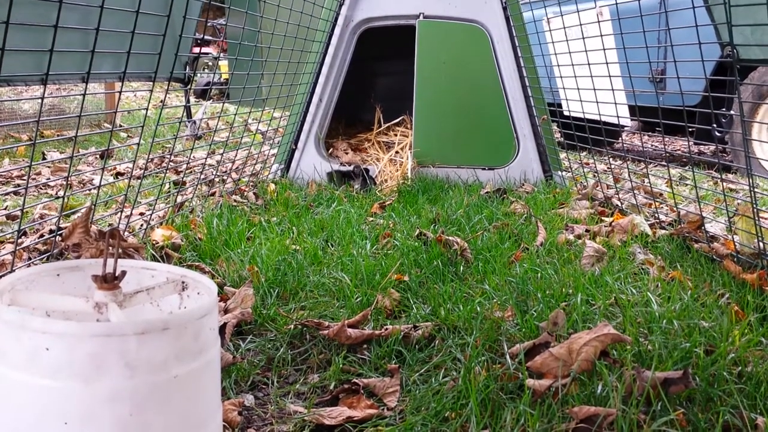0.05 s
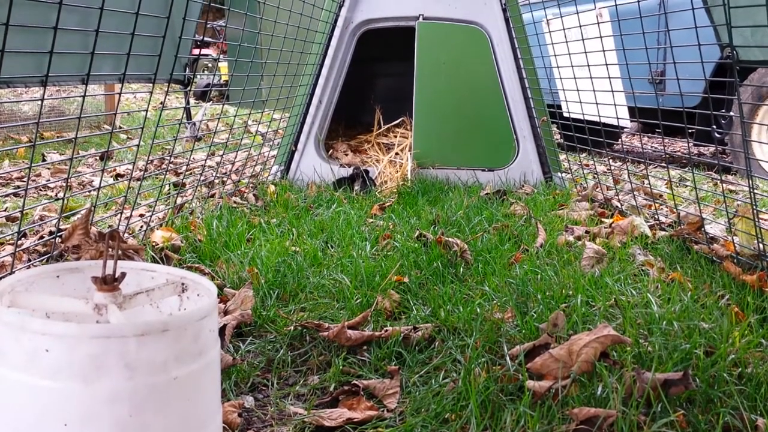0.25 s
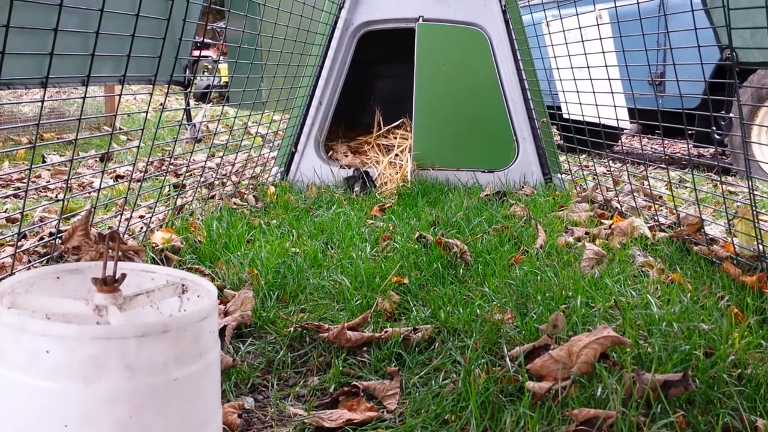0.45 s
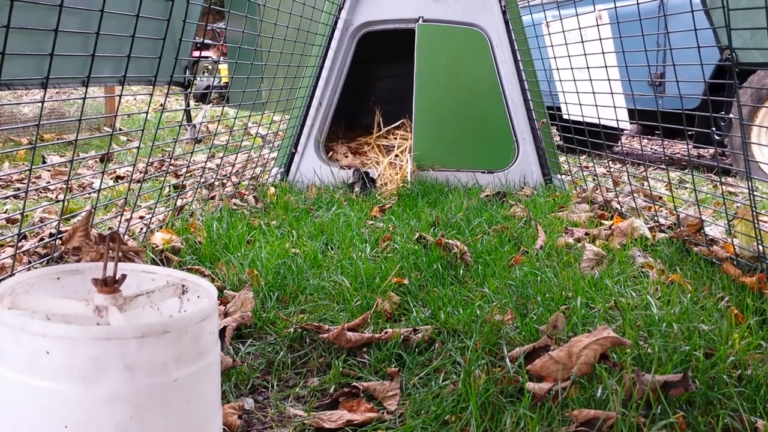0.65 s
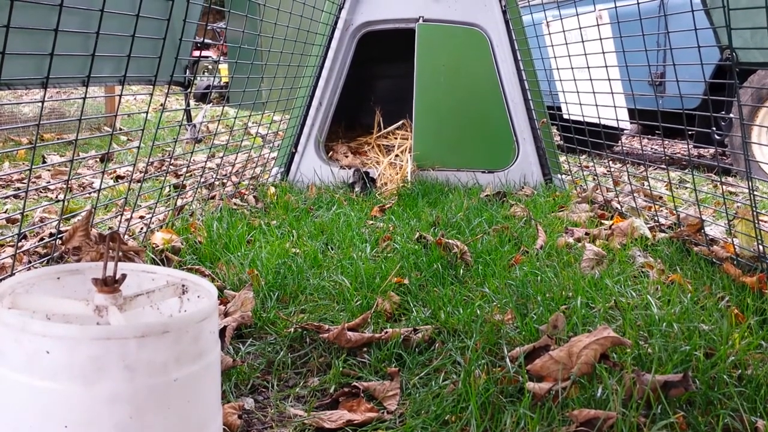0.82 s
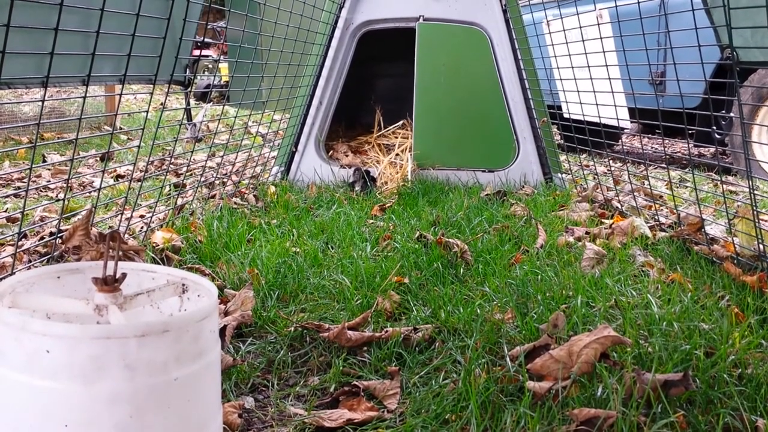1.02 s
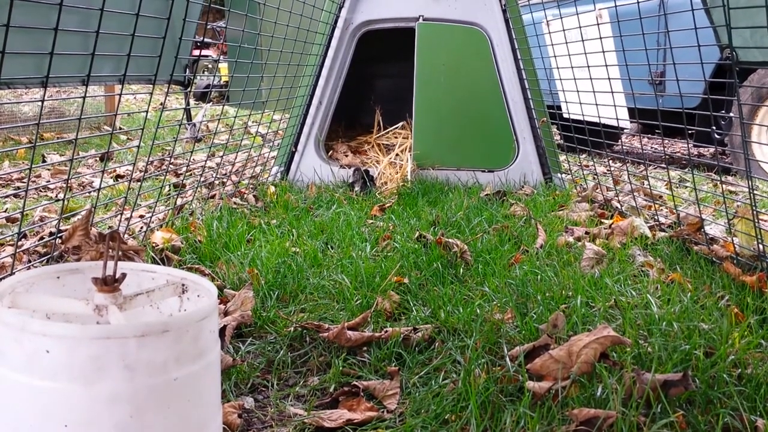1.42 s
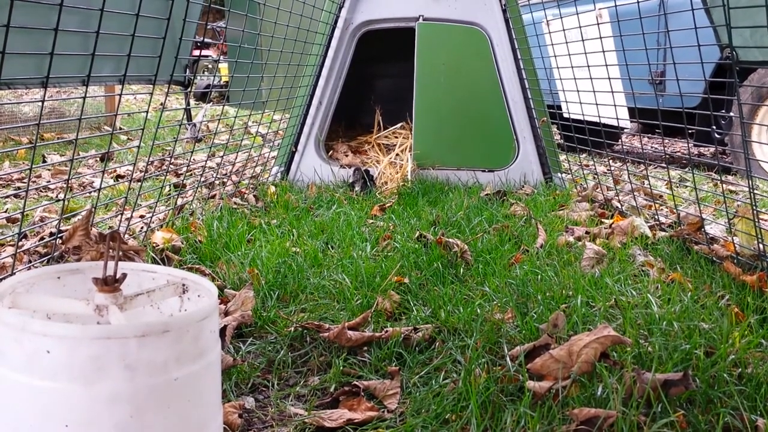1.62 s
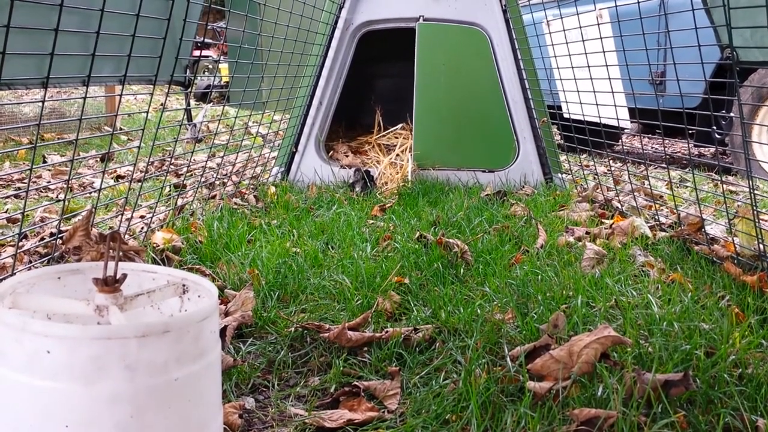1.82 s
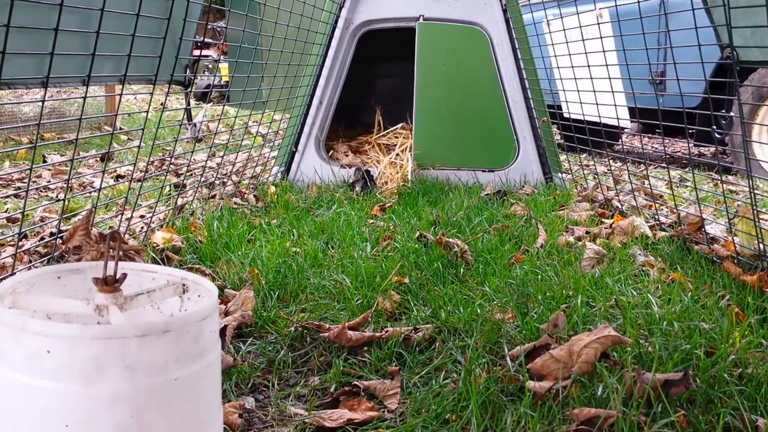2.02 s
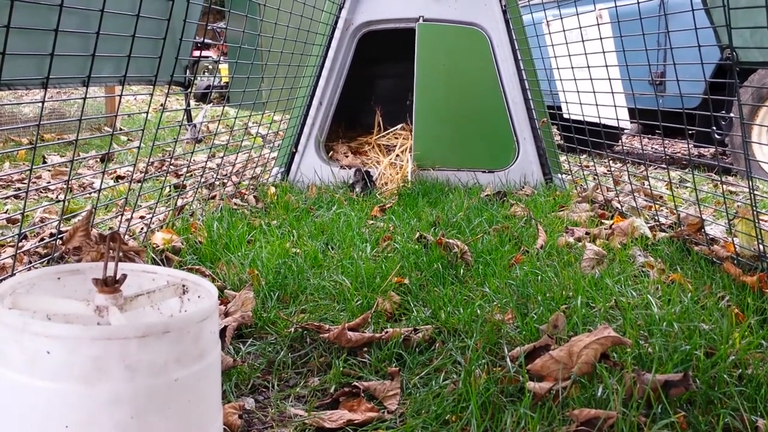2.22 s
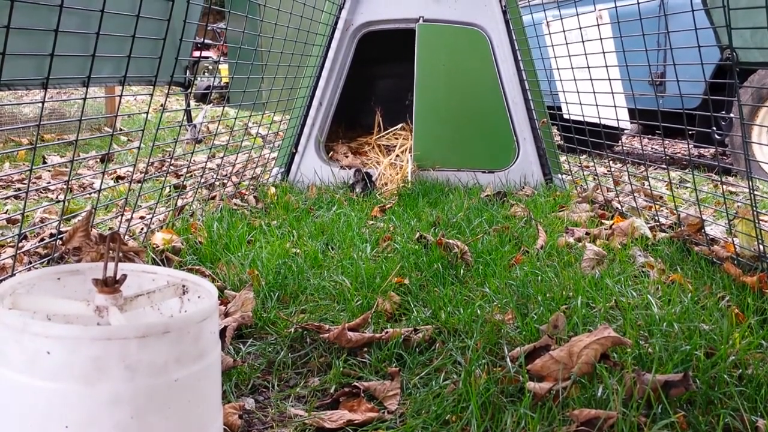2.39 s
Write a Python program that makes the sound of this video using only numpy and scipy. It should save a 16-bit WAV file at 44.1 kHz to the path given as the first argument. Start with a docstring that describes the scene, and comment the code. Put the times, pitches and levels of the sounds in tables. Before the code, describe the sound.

High chirps of chicks in a backyard run, with a hen's quiet, low clucks.

```python
"""Chicks peep in a backyard run, heard on a stereo pair: some from the coop, one nearer the microphones.
Each peep is a near-pure whistle that arches, sweeps down and drops into a weak low tail; echoes off
coop and ground colour it differently at each microphone. Straight ahead, a hen clucks softly about
twice a second. Straw and dry leaves rustle, a few puffs of air hit the right microphone, and the
yard rumbles faintly in the distance."""
import sys
import numpy as np
from scipy import signal
from scipy.fft import rfft, irfft
from scipy.io import wavfile
from scipy.ndimage import uniform_filter1d

SR = 44100
rng = np.random.default_rng(int(sys.argv[2]) if len(sys.argv) > 2 else 0)


def unload_wav(signal):
    """Save mono or channel-first audio to the path in sys.argv[1] as 16-bit WAV at rate SR, clipped to [-1, 1]."""
    wavfile.write(
        sys.argv[1],
        SR,
        np.round(np.clip(np.atleast_2d(signal).T, -1, 1) * 32767).astype(np.int16),
    )


N = 112454
TIME = np.arange(N) / SR


def chicks(echo_db=-15.5):
    """Chicks in the coop and a nearer one whose voice cracks, with their echoes round the yard."""
    # Peeps; the knee is where the fall breaks into the tail: (start [s], rise [s], fall [s], tail [s],
    # crest [Hz], knee [Hz], bow of the fall [exponent], level [dB], tail [dB], second voice [dB],
    # overtones [dB])
    coop_peeps = [(-.095, 0.027, .062, 0.0237, 5200, 3550, 1.1, -28.5, -5, -46, -2),
                  (0.164, .035, 0.049, 0.0084, 5400, 3380, 0.59, -20.5, -1.5, -32, 7),
                  (.372, 0.028, .078, 0.01, 5010, 3500, 1.1, -24.5, -10.5, -33, 3),
                  (0.761, 0.025, 0.085, 0.024, 5420, 3650, 0.91, -18, -10, -8, 2.5),
                  (1.069, 0.031, 0.071, 0.022, 5570, 3625, 0.95, -16.5, -14.5, -13, 0.5),
                  (1.515, .036, 0.088, 0.032, 5550, 3670, 0.88, -19, -10.5, -7, -1.5),
                  (1.828, 0.039, 0.075, 0.028, 5480, 3656, 1.17, -16.5, -14, -9, 0),
                  (2.158, 0.037, 0.079, 0.023, 5660, 3637, 1.01, -16.5, -13.5, -0.5, -3),
                  (2.226, 0.017, 0.063, 0.034, 4630, 3320, 1.9, -42.5, 5.5, -30, 8.5)]
    near_peeps = [(0.519, 0.017, 0.074, 0.03, 5183, 3890, 1.5, -10.5, -6.5, -32, -1.5),
                  (.903, 0.035, 0.046, 0.045, 4987, 4240, 1.6, -10.5, -10.5, -36, 3.5),
                  (1.534, .022, .038, 0.036, 4624, 3790, 1.4, -23, -5, -18, -2.5)]
    # Voices: swell at start, crest, mid-fall, late fall and knee [dB]; the tail's fade [dB], first and
    # last pitch [Hz]; 2nd and 3rd harmonic as (before the knee [dB], after it [dB])
    coop_voice = dict(swell_db=[-37.5, -23.5, -7, -0.5, -7.5],
                  fade_db=-10.5, drop_hz=3530, end_hz=2720, overtones_db=[(-31, -18.5), (-41, -30.5)])
    near_voice = dict(swell_db=[-35, -14, -9.5, -2.5, -6],
                  fade_db=-17, drop_hz=3372, end_hz=2828, overtones_db=[(-34, -10.5), (-54, -26)])
    # Paths to the microphones: (frequency [Hz], left [dB], right [dB], left phase lead [rad])
    coop_path = [(2580, 10.5, -14, -1.6), (2890, -7, -11, -1.2), (3330, 4, -8, -3.5),
                 (3590, -37, -4.5, 2.5), (3818, 3, -12, 0.2), (3900, 1, -10.5, 0.055),
                 (4200, 3.5, 2.5, 1.67), (4750, -3, -3, 0.66), (4314, -16, 3, -1), (4680, 0.5, 0, 0.89),
                 (4880, -0.5, 4.5, -2.14), (5030, -3.5, -7, 1.96), (6040, 6.5, 3, -0.16)]
    near_path = [(2840, -3, -8.5, 2), (3430, -2, -21, 1), (4100, 5.5, 1, 1), (4250, -5, 0.5, 0.44),
                 (4500, -6, 4.5, 3.5), (4550, -4, 7.5, 2.6), (4670, -15, -7, 1.5), (4945, -0.5, -7, 0.5),
                 (5360, -35, -38, 17)]
    direct = sum(peep(row, coop_voice, coop_path) for row in coop_peeps)
    direct += sum(peep(row, near_voice, near_path) for row in near_peeps)
    return direct + from_db(echo_db) * echoes(resonate(direct.mean(axis=0), hz=4850, width=1400))


def peep(row, voice, path, start_ratio=0.91, second_ratio=0.895, wobble=0.0052, flutter_db=2.19):
    """One whistle: up to a crest, louder on the way down, then a drop into a reedy tail."""
    # How well the beak radiates overtones: (frequency [Hz], gain [dB])
    beak = [(5500, -0.5), (9300, 0), (10300, -17), (12500, -6), (14500, -4)]
    start, rise, fall, tail, crest_hz, knee_hz, bow, db, tail_db, second_db, reedy_db = row
    crest = start + rise
    knee = crest + fall
    rising = np.clip((TIME - start) / rise, 0, 1)
    falling = np.clip((TIME - crest) / fall, 0, 2)
    fading = np.clip((TIME - knee) / tail, 0, 1)
    broken = 0.5 + 0.5 * np.tanh((TIME - knee) / 0.0012)  # 0 before the knee, 1 after

    rise_hz = crest_hz * (1 - (1 - start_ratio) * (1 - rising) ** 2)
    hz = smooth(rise_hz - (crest_hz - knee_hz) * falling ** bow, span_s=0.012)
    tail_hz = voice["end_hz"] + (voice["drop_hz"] - voice["end_hz"]) * (1 - fading) ** 1.62
    hz += broken * (tail_hz - hz)

    swell_times = [start, crest, crest + fall / 2, crest + 0.835 * fall, knee]
    shape_db = np.interp(TIME, swell_times, voice["swell_db"])
    shape_db += broken * (tail_db + voice["fade_db"] * fading - shape_db)
    level = from_db(db + shape_db + flutter_db * drift(83)) * gate(start, knee + tail, edge_s=0.004)
    level *= 1 + 0.29 * swell(crest, width_s=0.021) * drift(340)  # unsteady around the crest

    phase = 2 * np.pi * np.cumsum(hz * (1 + wobble * drift(130))) / SR
    left_db, right_db, lead = [smooth(at_hz(path, hz, column), span_s=0.0015) for column in (1, 2, 3)]
    mic_phase = lead * np.array([[0.5], [-0.5]])
    tone = from_db([left_db, right_db]) * np.sin(phase + mic_phase)
    knee_dip = (2 * broken - 1) ** 2  # overtones vanish briefly as the voice breaks
    for k, (clear_db, cracked_db) in enumerate(voice["overtones_db"], 2):
        overtone_db = reedy_db + clear_db + broken * (cracked_db - clear_db) + at_hz(beak, k * hz)
        tone += from_db(overtone_db) * knee_dip * np.sin(k * phase + mic_phase)
    second_level = from_db(second_db) * swell(crest + 0.0038, width_s=0.0089)
    return level * (tone + second_level * np.sin(second_ratio * phase))


def hen(echo_db=-16):
    """The hen clucks straight ahead of the microphones, and the yard echoes her."""
    # Clucks: (hoot time [s], pitch [Hz], glide [Hz/s], hoot [dB], octave [dB], catch delay [s],
    # catch half-width [s], catch [dB], rasp [dB])
    clucks = [(-.02, 286.3, 7, -40.5, 3.5, 0.03, 0.0067, -44, -2.5),
              (0.345, 282.8, -300, -36.5, 3.5, 0.029, 0.012, -39.5, -8.5),
              (0.729, 285.7, -200, -43.5, 10, 0.042, 0.0076, -42.5, -4),
              (1.183, 339, 1499.5, -37, -2.5, 0.041, 0.0029, -45, -4.5),
              (1.564, 303, 299.5, -35.5, -9, 0.03, 0.0089, -41, -5),
              (2.019, 311.6, 99, -33, -5, 0.0405, 0.0056, -35, -7.5),
              (2.442, 296, 301, -34, -7, 0.036, 0.0026, -36.5, -8)]
    direct = sum(cluck(*row) for row in clucks)
    return direct + from_db(echo_db) * echoes(direct)


def cluck(time, pitch_hz, glide, db, octave_db, catch_delay, catch_width, catch_db, rasp_db):
    """A closed-beak hoot of three harmonics, then a catch; rasp puffs through the throat each cycle."""
    # Throat resonances: (frequency [Hz], bandwidth [Hz], gain [dB])
    throat = [(347, 134, 7.5), (572, 145, -0.5), (741, 117, 6), (1080, 106, -9), (1690, 780, -15.5)]
    lead_s, onset_s = 0.028, 0.0027
    start = time - lead_s
    hoot = swell(time, width_s=0.0092)
    catch = swell(time + catch_delay, catch_width)
    sounding = gate(start, time + catch_delay + catch_width + 0.0096, edge_s=0.005)

    hz = pitch_hz + glide * np.clip(TIME - time, -lead_s, catch_delay)
    jitter = 0.0254 + 0.0808 * (1 - hoot)  # the pitch is steadiest in the hoot
    phase = 2 * np.pi * np.cumsum(hz * (1 + jitter * drift(97.2))) / SR
    tone = np.sin(phase) + from_db(octave_db) * np.sin(2 * phase) + from_db(-20.5) * np.sin(3 * phase)
    puffs = rng.standard_normal(N) * (1 + np.cos(phase)) ** 2
    rasp = rms_one(sum(from_db(gain_db) * resonate(resonate(puffs, centre, width), centre, width)
                       for centre, width, gain_db in throat))

    bed = from_db(db - 6)  # soft voicing around the hoot
    voiced = np.maximum(from_db(db) * hoot + from_db(catch_db) * catch, 0.49 * bed)
    throat_opening = from_db(db - 13.5) * swell(start + onset_s, onset_s)
    breathy = bed * (1 - hoot / 2) + from_db(catch_db - 5) * catch + throat_opening
    return sounding * (voiced * tone + from_db(rasp_db) * breathy * rasp)


def echoes(x, t60_s=0.29, build_s=0.0043):
    """Diffuse echoes from coop, fence and house, different at each microphone."""
    t = TIME[:SR // 2]
    tail = rng.standard_normal((2, len(t))) * from_db(-60 * t / t60_s) * (1 - np.exp(-t / build_s))
    return signal.fftconvolve(x[None], rms_one(tail) / np.sqrt(len(t)), axes=1)[:, :N]


def straw(snaps_per_s=1400, spread_db=4, left_db=-2):
    """Dense tiny snaps of straw and leaves underfoot, a little to the right."""
    # Rustles: (time [s], half-width [s], level [dB])
    rustles = [(.075, 0.013, -54), (.112, 0.0073, -42), (.126, 0.0085, -43), (.165, 0.0064, -44.5),
               (.507, 0.0022, -44.5), (.546, 0.0019, -42), (.56, 0.057, -56.5), (1.19, 0.083, -56.5),
               (1.582, 0.014, -43.5), (1.59, 0.051, -48), (1.90, 0.055, -59), (2.23, 0.04, -50)]
    # Colour of the snaps: (frequency [Hz], level [dB])
    spectrum = [(1000, -17), (2800, -8), (5000, -4), (8500, -1.5), (10500, -7), (15500, -17.5)]
    snaps = (rng.random((2, N)) < snaps_per_s / SR) * rng.choice([-1, 1], (2, N))
    sizes = from_db(spread_db * np.minimum(rng.exponential(1, (2, N)), 3))
    return colour(snaps * sizes, spectrum) * swells(rustles) * from_db([[left_db], [0]])


def wind(left_db=-30):
    """Puffs of air thump on the right microphone and barely touch the left."""
    # Puffs: (time [s], half-width [s], level [dB])
    puffs = [(.055, 0.018, -37), (.187, 0.0052, -25.5), (.225, 0.013, -43), (.267, 0.004, -31),
             (.45, 0.016, -39), (.55, 0.0099, -29), (.585, 0.018, -38.5), (.66, 0.036, -45)]
    # Colour of the thumps: (frequency [Hz], level [dB])
    spectrum = [(20, -18), (50, -5), (90, 6), (150, 0), (250, -10.5), (450, -28), (900, -48)]
    return colour(rng.standard_normal(N), spectrum) * swells(puffs) * from_db([[left_db], [0]])


def yard():
    """A distant rumble, its low end largely shared by both microphones, and a light leafy hiss."""
    # Colour of the rumble: (frequency [Hz], level [dB], left-right likeness [0 to 1])
    rumble_spectrum = [(20, -9.5, 0), (53.4, 1, 1), (93, 1.5, 0.79), (163, -8, 0.84), (296, -13, 0.75),
                       (567, -17, 0.53), (950, -19, 0), (1670, -23, 0), (4000, -22.5, 0.062),
                       (6600, -27, 0), (9900, -31, 0), (15500, -32, 0)]
    # Colour of the hiss: (frequency [Hz], level [dB])
    hiss_spectrum = [(800, -14), (2000, -5.5), (4500, 1.5), (7000, 1.5), (10000, -4), (15500, -10)]
    # Rise and fall of each: (time [s], level [dB])
    rumble_levels = [(0, -50.5), (.85, -49.5), (1.15, -51), (1.4, -54.5), (1.8, -55), (1.95, -52.5),
                     (2.55, -52.5)]
    hiss_levels = [(0, -54), (.55, -54.5), (.9, -56.5), (1.25, -61.5), (1.4, -63), (1.8, -61), (2.0, -59),
                   (2.55, -61)]
    alike = at_hz(rumble_spectrum, np.fft.rfftfreq(N, 1 / SR), column=2)
    mid, side = rfft(rng.standard_normal((2, N)))
    left_right = np.sqrt(1 + alike) * mid + np.sqrt(1 - alike) * side * [[1], [-1]]
    rumble = colour(irfft(left_right, N), rumble_spectrum)
    hiss = colour(rng.standard_normal((2, N)), hiss_spectrum)
    rumble_db = np.interp(TIME, *np.transpose(rumble_levels))
    hiss_db = np.interp(TIME, *np.transpose(hiss_levels)) + 0.25 * drift(31)
    return from_db(rumble_db) * rumble + from_db(hiss_db) * hiss


def from_db(db):
    """Decibels to gain."""
    return 10 ** (np.asarray(db) / 20)


def rms_one(x):
    """Scale to unit power."""
    return x / np.sqrt(np.mean(x ** 2) + 1e-20)


def at_hz(table, hz, column=1):
    """Read a column of a table on a log-frequency axis."""
    table = np.array(table, float)
    return np.interp(np.log(np.maximum(hz, 1)), np.log(table[:, 0]), table[:, column])


def drift(rate_hz):
    """Random wandering of unit power, mostly slower than the given rate."""
    pole = np.exp(-2 * np.pi * rate_hz / SR)
    return rms_one(signal.lfilter([1], [1, -2 * pole, pole * pole], rng.standard_normal(N + SR))[SR:])


def colour(x, spectrum):
    """Give a noise a spectrum, at unit power."""
    gain = from_db(at_hz(spectrum, np.fft.rfftfreq(N, 1 / SR)))
    return rms_one(irfft(rfft(x) * gain, N))


def swell(time, width_s):
    """A bell-shaped rise and fall of the given half-width."""
    return np.exp(-0.5 * ((TIME - time) / width_s) ** 2)


def swells(rows):
    """The joint level of several swells, added in power."""
    return np.sqrt(sum((from_db(db) * swell(time, width)) ** 2 for time, width, db in rows))


def gate(start, end, edge_s):
    """On from start to end, with soft edges."""
    return np.clip((TIME - start) / edge_s, 0, 1) * np.clip((end - TIME) / edge_s, 0, 1)


def resonate(x, hz, width):
    """One resonance with gain 1 at its peak."""
    radius = np.exp(-np.pi * width / SR)
    feedback = [1, -2 * radius * np.cos(2 * np.pi * hz / SR), radius ** 2]
    return signal.lfilter(np.array([1, 0, -1]) * (1 - radius ** 2) / 2, feedback, x)


def smooth(x, span_s):
    """Round off corners over about this span."""
    size = max(1, int(span_s * SR))
    return uniform_filter1d(uniform_filter1d(x, size), size)


def scene():
    """The backyard run as it reaches the two microphones."""
    return chicks() + hen() + straw() + wind() + yard()


def record(dry):
    """The top is cut steeply above 15650 Hz."""
    return signal.sosfilt(signal.ellip(12, 0.1, 80, 15650, fs=SR, output="sos"), dry)


dry = scene()
out = record(dry)
unload_wav(out)
```